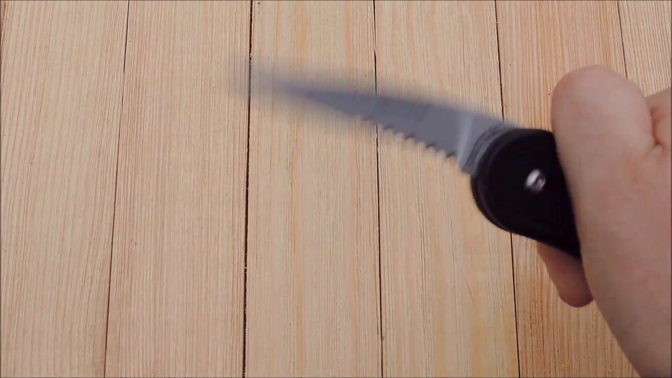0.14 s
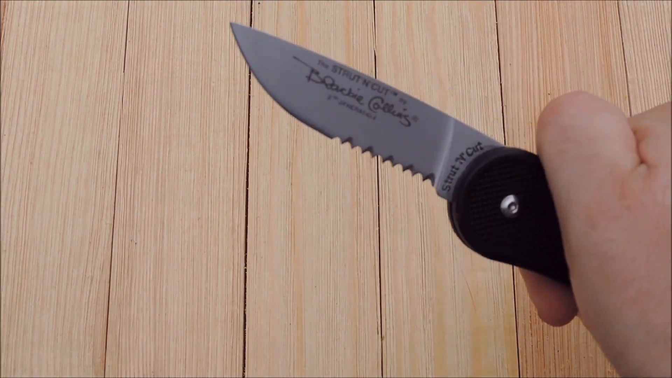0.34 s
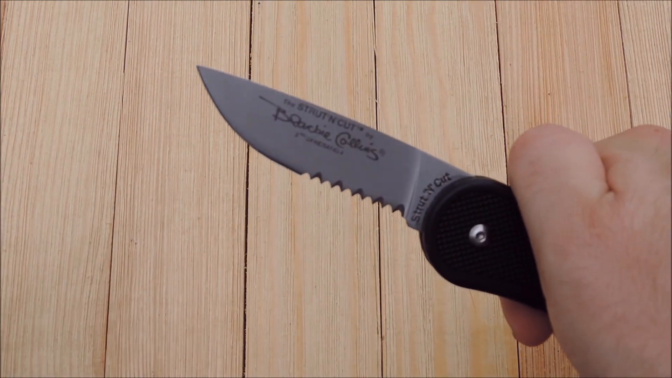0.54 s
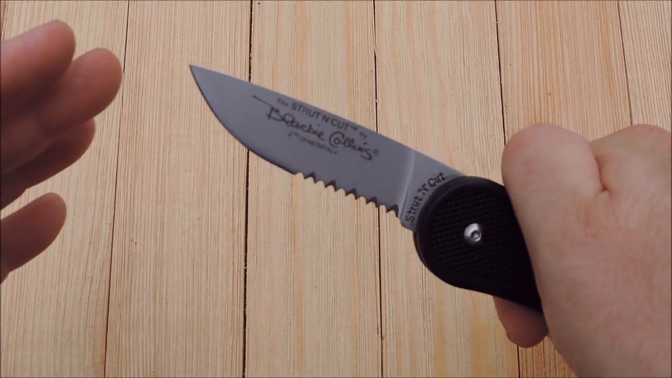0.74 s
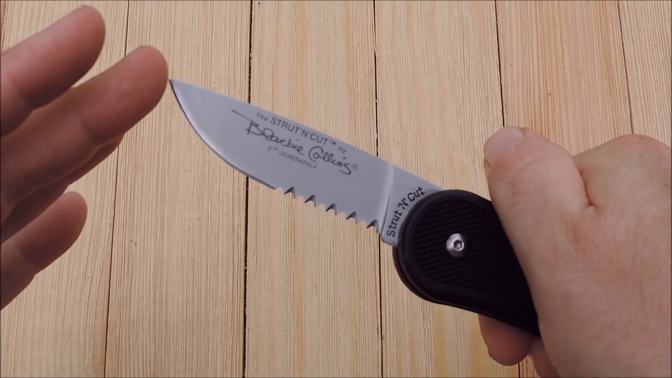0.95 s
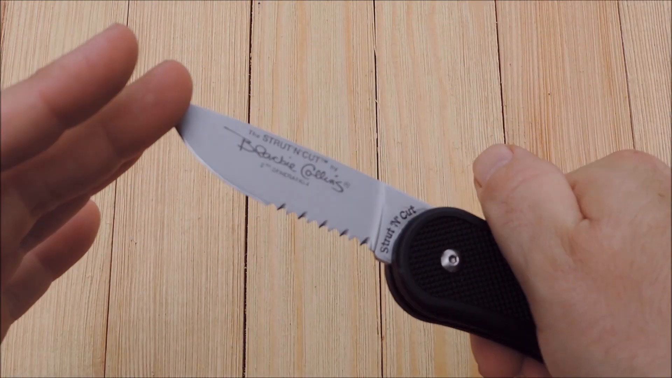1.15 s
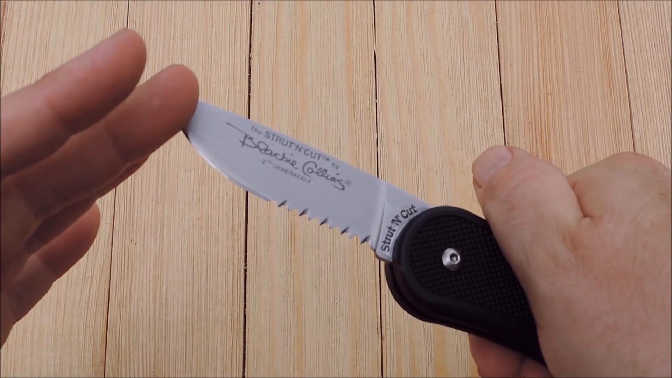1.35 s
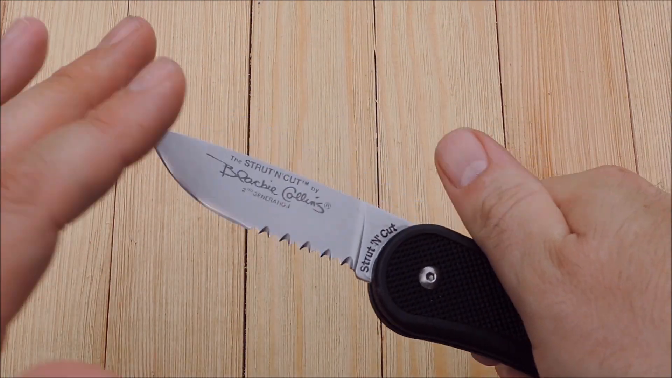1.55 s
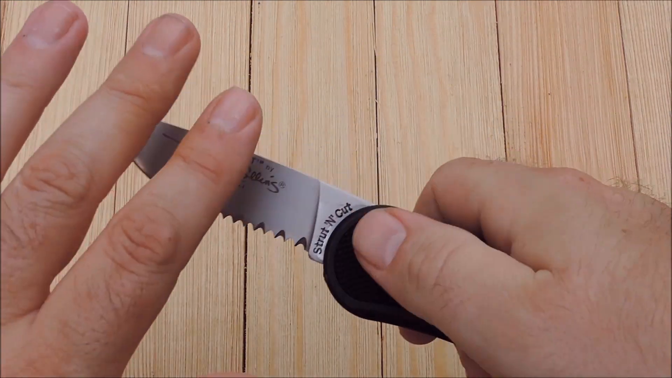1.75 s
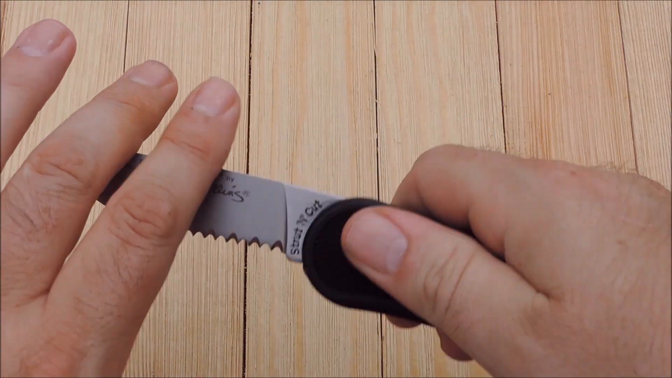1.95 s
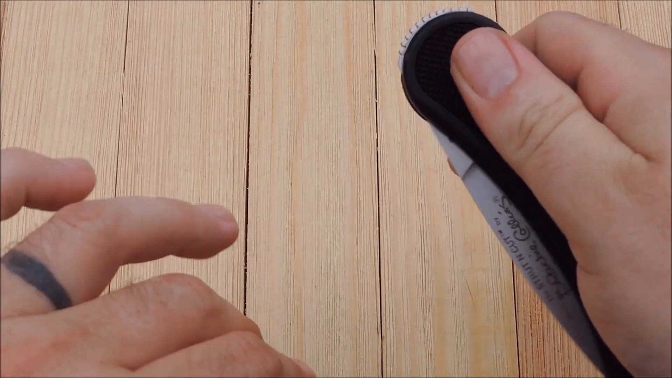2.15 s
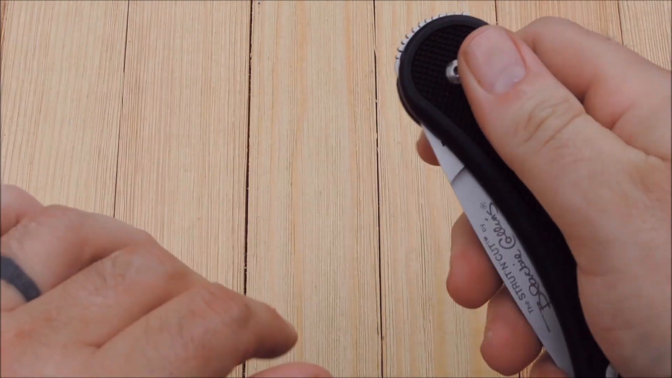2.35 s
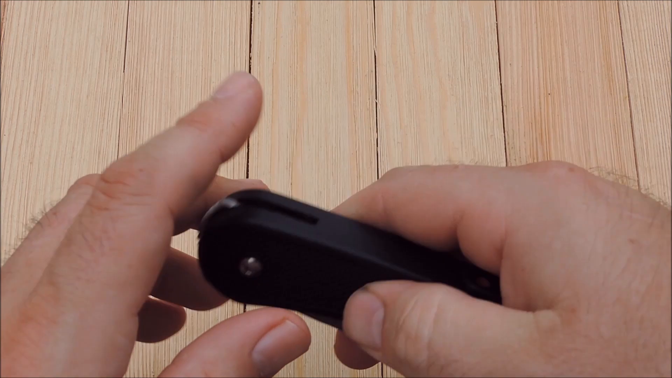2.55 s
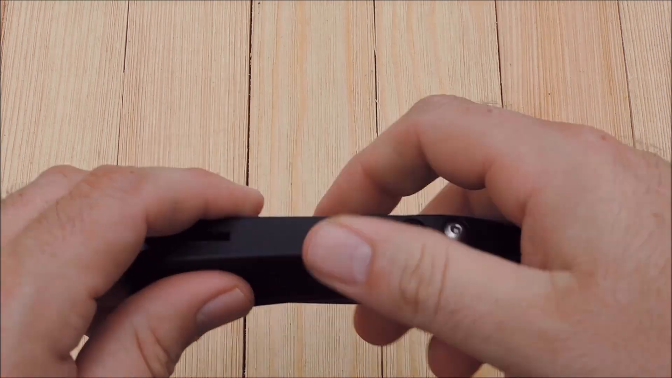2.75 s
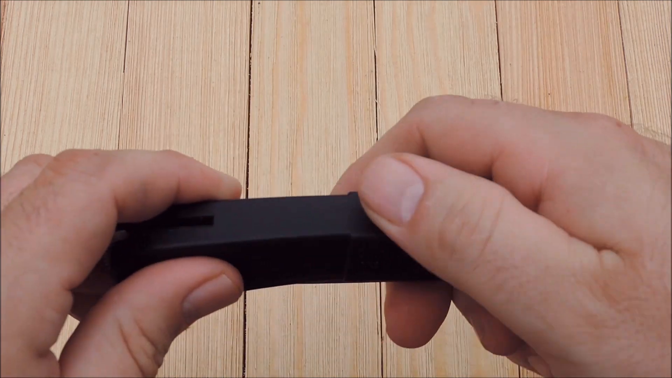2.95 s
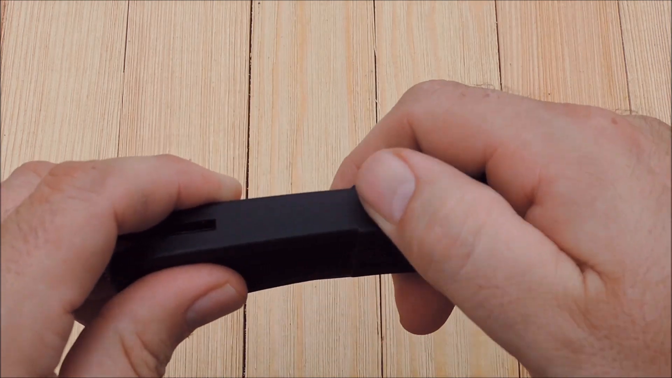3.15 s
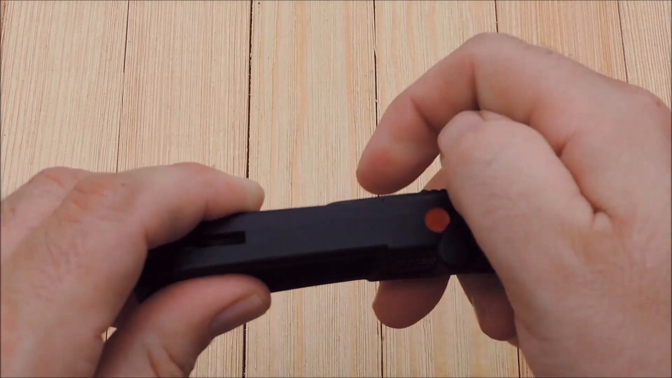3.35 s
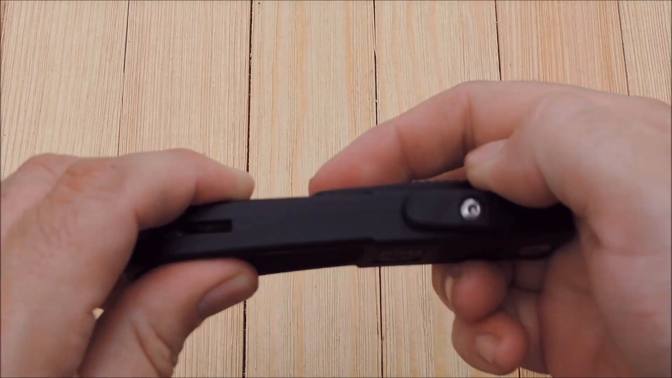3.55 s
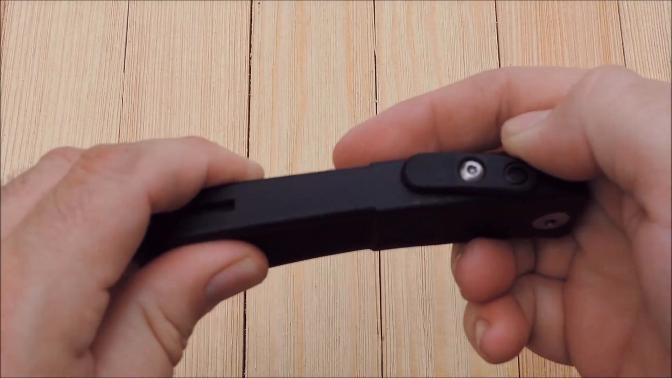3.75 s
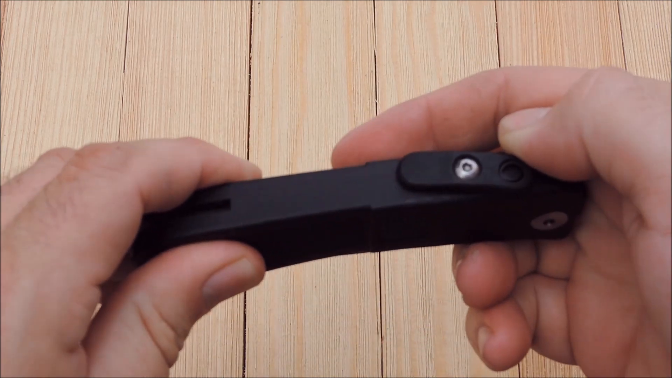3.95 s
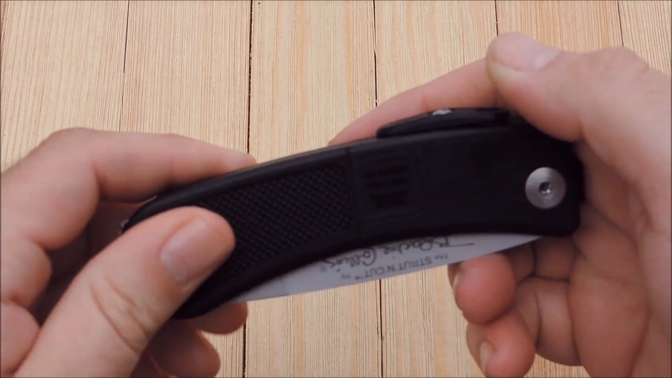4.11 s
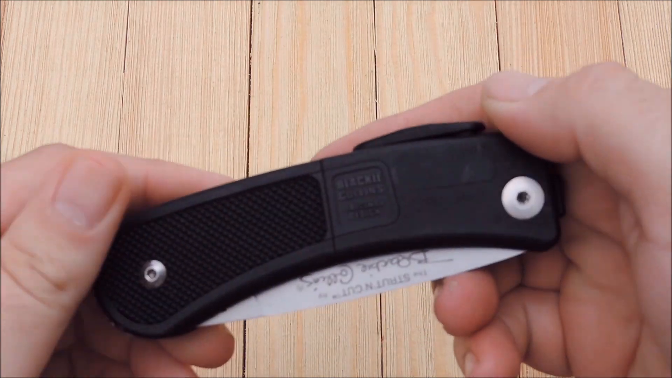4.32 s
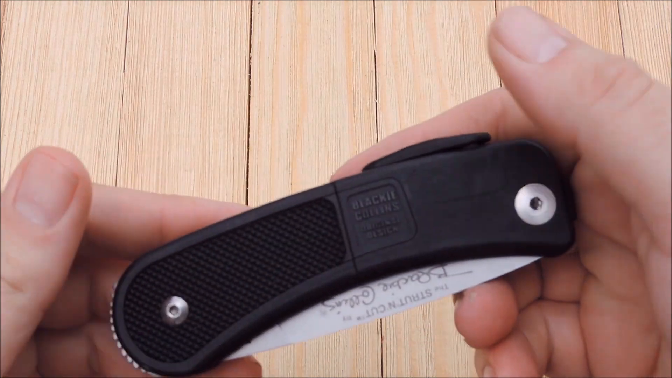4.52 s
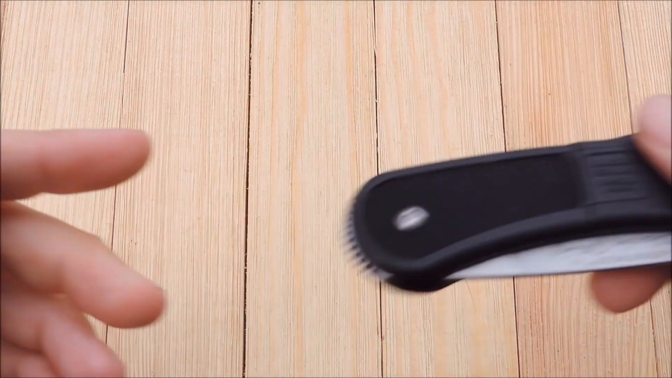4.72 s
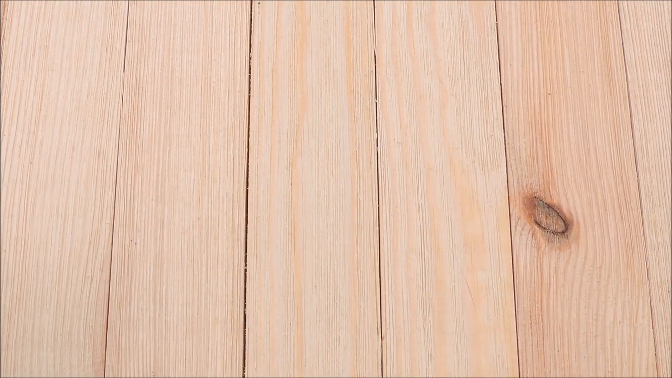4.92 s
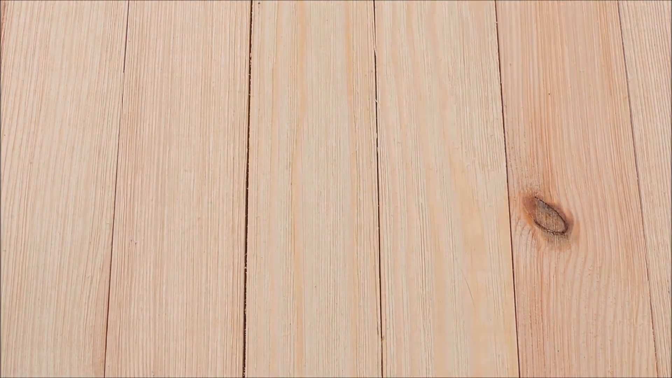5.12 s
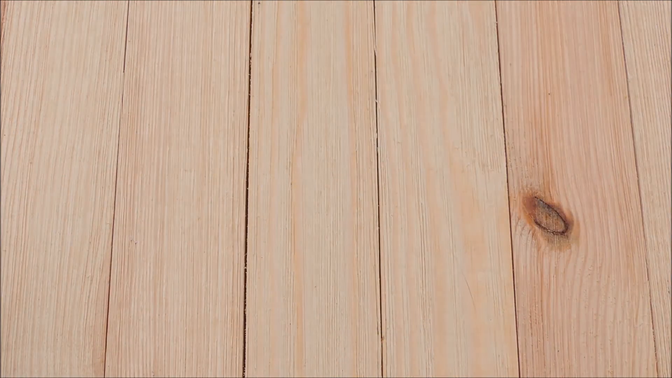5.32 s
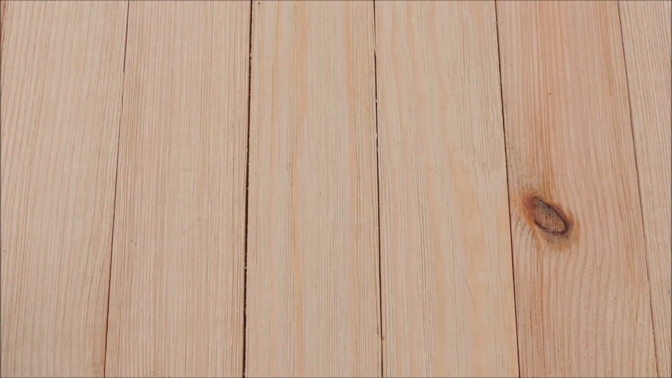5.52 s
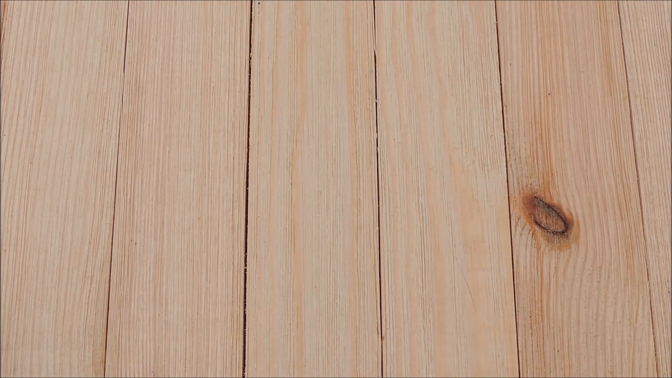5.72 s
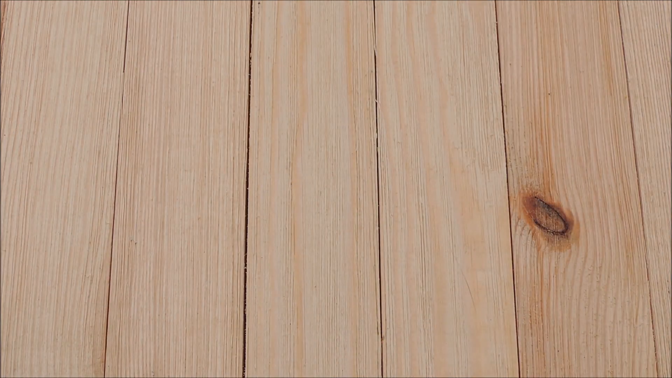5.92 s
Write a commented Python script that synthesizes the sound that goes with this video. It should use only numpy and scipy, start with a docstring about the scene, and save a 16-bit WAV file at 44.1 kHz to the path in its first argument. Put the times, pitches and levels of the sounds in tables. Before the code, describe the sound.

Indoors, two sharp metallic knife snaps, small catch clicks and a quiet double tap on a wooden table over faint hiss, with faint distant chirps.

```python
"""Folding knife over a wooden table

A blade snaps open, snaps shut and bounces; a catch ticks over and clicks home; the knife is laid down end by end.
Contacts, and one very faint high tick of unknown origin, are swelling tones, noise cracks through steel resonances
and a knock of the table; slides are rough noise through the handle cavity and the steel. A low drone, a rumble and
an airy hiss are shaped noise. A small far bird chirps faintly: gliding tones with roughened phase and echoes."""
import sys
import numpy as np
from scipy import signal
from scipy.fft import rfft, irfft, next_fast_len
from scipy.io import wavfile
from scipy.ndimage import uniform_filter1d

SR = 44100
rng = np.random.default_rng(int(sys.argv[2]) if len(sys.argv) > 2 else 0)


def generate_wav(sig):
    """Save sig (samples, or channels by samples) to the path in sys.argv[1] as 16-bit PCM at SR."""
    pcm = np.round(np.clip(np.atleast_2d(sig).T, -1, 1) * 32767).astype(np.int16)
    wavfile.write(sys.argv[1], SR, pcm)


def magnitude_from_level(level_db):
    """Linear magnitude for a level in decibels (20 dB per decade)."""
    exponent = np.asarray(level_db, float) / 20
    return 10 ** exponent


N = 267775  # length in samples

# low broad noise: (frequency [Hz], relative density [dB])
RUMBLE_SPECTRUM = [(8.8, -52), (15, -7), (84, -15.5), (117, -9), (182, -15), (221, -7.5), (321, -18),
                   (446, -18.5), (555, -17.5), (2800, -29.5), (3640, -68), (6160, -120)]
# airy noise: (frequency [Hz], relative density [dB])
HISS_SPECTRUM = [(1470, -27), (2500, -28), (3030, -7.5), (3510, -2), (4090, -3), (4500, 3.5), (7050, -7),
                 (8410, -17.5), (9260, -9), (10000, -8), (10600, -18.5), (13450, -21), (13650, -55),
                 (14500, -88)]
# wavering machine tones, whose response is squared in use: (frequency [Hz], width [Hz], level before squaring [dB])
DRONE_MODES = [(53.7, 9.1, -2.5), (120.8, 24, -2.5), (160.7, 13, -3.5), (224.8, 43.6, -1),
               (242.4, 34.4, -7), (288.6, 7.7, -5), (342.4, 22.5, -4), (364.7, 38, -5), (456.6, 28, -6),
               (693, 4.7, -11)]
# correlation of the two ports in the background: (frequency [Hz], left-right likeness [-1 to 1])
PORT_LIKENESS = [(60, 0.87), (130, 0.98), (290, 0.95), (640, 0.7), (1410, 0.49), (3100, -0.18),
                 (6820, 0.54), (15000, -0.24)]
# balance of the background: (frequency [Hz], left minus right [dB])
PORT_LEAN = [(60, 0), (180, 1.5), (550, 1), (1650, 2), (4970, -1), (15000, 0.5)]
# decay of the room: (frequency [Hz], time to fall 60 dB [s])
WALL_DECAY = [(300, 0.14), (2000, 0.24), (6000, 0.27), (14000, 0.21)]
# chirps of the bird: (time of the lowest pitch [s], level before direct and echo shares [dB], lowest pitch [Hz])
CHIRPS = [(1.345, -54.5, 3430), (2.755, -58, 3400), (4.015, -60, 3290), (4.47, -56, 3550),
          (5.345, -54, 3350), (5.425, -58.5, 3100)]
# where the knife is held: (time [s], left minus right [dB], left lag [s])
HELD_AT = [(0.35, 3, 4.5e-5), (2.3, -2, 2.5e-5), (3.75, -4, -0.5e-5), (5.9, 2.5, 4e-5)]
# resonances of the steel parts: (frequency [Hz], width [Hz], level [dB])
STEEL_MODES = [(3100, 380, -3.5), (3880, 630, -2.5), (4390, 540, 0.5), (5910, 390, -0.5), (7160, 93, -2.5),
               (7340, 170, -10.5), (8860, 810, -7.5), (11860, 1300, -9.5), (13300, 4000, -14),
               (14400, 1400, -11.5)]
# the table top answering through the air and the hands: (frequency [Hz], width [Hz], level [dB])
TABLE_MODES = [(30, 39, -10), (182, 200, -15), (598, 127, -2.5), (1035, 107, 1.5), (1450, 360, -8)]
# the handle's cavity as sliding parts excite it: (frequency [Hz], width [Hz], level [dB])
CAVITY_MODES = [(1960, 150, 8.5), (2550, 190, 2)]
# the blade sliding on its pivot and rattling loose:
# (start [s], length [s], share of it before the loudest point [0 to 1], rms [dB])
SLIDES = [(0.29, 0.043, 1, -50), (0.346, 0.06, 0.045, -50), (2.264, 0.025, 0.79, -85),
          (2.303, 0.083, 0.077, -53.5), (3.394, 0.01, 0.25, -49), (3.748, 0.015, 0.13, -46),
          (5.904, 0.028, 0.11, -48.5), (5.928, 0.053, 0.099, -49.5)]
# an end of the knife meets the table: (time [s], thud peak [dB])
LANDINGS = [(5.9047, -33), (5.9272, -30.5)]
# contacts inside the knife, and one very faint high tick of unknown origin at 3.669 s; levels before placing:
# (time [s], ring peak [dB], ring pitch [Hz], time scale [s], crack peak [dB])
CONTACTS_AND_TICK = [(0.253, -48, 1930, 0.0025, -59), (0.3114, -31.5, 1910, 0.0035, -35),
                     (0.3441, -9.5, 3120, 0.0017, -10.5), (0.3453, -6.5, 1970, 0.0051, -12.5),
                     (0.3515, -25.5, 1860, 0.0057, -23), (2.257, -42, 2210, 0.002, -40),
                     (2.2981, -16, 1734, 0.0042, -8), (2.2986, -5, 2580, 0.0019, -7.5),
                     (2.3011, -6, 2165, 0.0024, -10), (2.3043, -21.5, 2100, 0.0024, -24.5),
                     (2.3468, -36, 2060, 0.0045, -32.5), (2.3474, -30.5, 2630, 0.0043, -30),
                     (2.44, -40, 2730, 0.0016, -46), (3.292, -50, 2380, .002, -59),
                     (3.3952, -42.5, 1920, 0.003, -35), (3.398, -36.5, 3780, 0.002, -54),
                     (3.401, -42, 2645, 0.004, -52.5), (3.5116, -33.5, 2870, 0.00124, -45),
                     (3.5956, -40, 2064, 0.0014, -49), (3.669, -52, 13600, 0.005, -61),
                     (3.7512, -31, 3150, 0.0027, -25), (3.7517, -18.5, 7860, 0.0018, -16.5),
                     (3.7525, -28.5, 1890, 0.0027, -27)]

RUMBLE_DB, DRONE_DB, HISS_DB = -51.5, -52, -56  # rms
FALL_S, RISE_S = 0.075, 0.057  # the two halves of a chirp
FALL_HZ_PER_S, RISE_HZ_PER_S = 26000, 17000
RISE_DB = 0.5  # the upward flick over the fall
KNOCK_DB = -10.5  # the table's answer relative to the crack
FOLLOW_S, ROCK_S, ROCK_LOSS_DB = 0.002, 0.0061, 7  # handle after thud, mean time between rocks, loss a rock
HANDLE_HZ, HANDLE_S = 1907, 0.0035  # mean ring pitch and contact time scale
HANDLE_DB, HANDLE_CRACK_DB = -1, 0.5  # ring and crack relative to the thud
SPAN = SR // 4  # samples computed for one short event


def unit(x):
    """Normalisation of mean power: scaled to rms 1."""
    return x / np.sqrt(np.mean(x ** 2) + 1e-20)


def along(points, hz):
    """Interpolation of (frequency [Hz], value) points on a logarithmic frequency axis."""
    f, v = np.transpose(points)
    return np.interp(np.log(hz + 1), np.log(f + 1), v)


def filtered(x, response):
    """Linear filtering: the spectrum of x times a complex response of frequency."""
    n = x.shape[-1]
    m = next_fast_len(n + 8192)
    return irfft(rfft(x, m) * response(np.fft.rfftfreq(m, 1 / SR)), m)[..., :n]


def resonances(modes):
    """Modal superposition: causal second-order resonances summed with alternating sign."""
    def response(f):
        total = 0
        for k, (centre, width, db) in enumerate(modes):
            damping = 1j * f * width
            total = total + (-1) ** k * magnitude_from_level(db) * damping / (centre ** 2 - f ** 2 + damping)
        return total
    return response


def add_at(out, s, sound):
    """Superposition of a short event, from the sample holding time s."""
    start = int(s * SR)
    out[:, start:start + SPAN] += sound


def rush(colour, lag_s, patchy_db):
    """Partially correlated stereo noise of rms 1 in faint patches; the right port hears it lag_s earlier."""
    z = signal.stft(rng.standard_normal((2, N)), nperseg=512)[2]
    field = uniform_filter1d(rng.standard_normal(z.shape[1:]), 8, 0)
    field = uniform_filter1d(field, 24, 1)
    pair = signal.istft(z * magnitude_from_level(patchy_db * unit(field)), nperseg=512)[1][:, :N]

    def mid_side(hz):
        turn = np.arccos(np.clip(along(PORT_LIKENESS, hz), -1, 1)) / 2  # sets the correlation of the ports
        return colour(hz) * np.array([np.cos(turn), np.sin(turn)])

    def ports(hz):
        lean = magnitude_from_level(np.outer([.5, -.5], along(PORT_LEAN, hz)))
        return lean * np.exp(np.outer([-1j, 1j], np.pi * hz * lag_s))

    mid, side = filtered(pair, mid_side)
    return unit(filtered(np.array([mid + side, mid - side]), ports))


def rumble():
    """Broadband low-frequency noise, shaped by its spectral density."""
    return magnitude_from_level(RUMBLE_DB) * rush(lambda hz: magnitude_from_level(along(RUMBLE_SPECTRUM, hz)), 3e-5, patchy_db=1.5)


def drone():
    """Narrowband noise: each machine resonance passes a slowly wavering tone."""
    return magnitude_from_level(DRONE_DB) * rush(lambda hz: abs(resonances(DRONE_MODES)(hz)) ** 2, 3e-5, patchy_db=1.5)


def hiss():
    """Steady airy noise, shaped by its spectral density."""
    return magnitude_from_level(HISS_DB) * rush(lambda hz: magnitude_from_level(along(HISS_SPECTRUM, hz)), 0.00012, patchy_db=1.04)


def walls():
    """Frequency-dependent reverberation: a fresh stereo noise tail, scaled to energy 1 at the left port."""
    hz, t, z = signal.stft(rng.standard_normal((2, SPAN)), SR, nperseg=128)
    decay = magnitude_from_level(-60 * t / along(WALL_DECAY, hz)[:, None])
    tail = signal.istft(z * decay, SR, nperseg=128)[1][:, :SPAN]
    return tail / np.linalg.norm(tail[0])


def bird():
    """Frequency modulation: each chirp slurs down, hoarse, then flicks up again, blurred by echoes."""
    out, t = np.zeros((2, N + SPAN)), np.arange(SPAN) / SR - FALL_S
    for s, db, low_hz in CHIRPS:
        pitch = low_hz + np.where(t < 0, -FALL_HZ_PER_S, RISE_HZ_PER_S) * t
        swell = np.interp(t, [-FALL_S, .01 - FALL_S, -.01, 0, RISE_S - .015, RISE_S],
                          [0, 1, 1, .5, magnitude_from_level(RISE_DB), 0])
        hoarse = np.cumsum(rng.standard_normal(SPAN) * np.where(t < 0, .2, .06))  # phase wander [rad]
        call = magnitude_from_level(db) * swell * np.sin(2 * np.pi * np.cumsum(pitch) / SR + hoarse)
        echoes = signal.fftconvolve(call[None], walls(), axes=1)[:, :SPAN]
        add_at(out, s - FALL_S, 0.53 * call + 0.89 * echoes)
    return filtered(out[:, :N], lambda hz: 1 / (1 + (hz / 6500) ** 10))  # distance takes the treble


def placed(direct, s, wet_db):
    """Level and time differences between the ports set the direct sound in place; the room's answer is added."""
    when, lean_db, lag_s = np.transpose(HELD_AT)
    halves = np.array([[.5], [-.5]])
    late = np.pad(direct, ((0, 0), (130, 0)))  # the room answers 130 samples later
    late = signal.fftconvolve(late, walls(), axes=1)[:, :SPAN]
    near = magnitude_from_level(np.interp(s, when, lean_db) * halves) * direct
    within_sample = s * SR % 1 / SR
    nearer = rng.uniform(0, 2.5e-5, (2, 1))  # each part lies a little nearer one port
    delay = within_sample + 1e-4 + np.interp(s, when, lag_s) * halves + nearer
    return filtered(near + magnitude_from_level(wet_db) * late, lambda hz: np.exp(-2j * np.pi * hz * delay))


def clatter(envelope, modes, tilt):
    """Modal filtering of enveloped noise, tilted by hardness; each port faces other small parts."""
    noise = rng.standard_normal((3, len(envelope)))
    own_treble = filtered(noise[1:], lambda hz: np.clip(hz / 9000, 0, 1.5) ** 1.25)
    colour = lambda hz: resonances(modes)(hz) * (1 + 1j * hz / 4000) ** tilt
    return filtered((noise[0] + own_treble) * envelope, colour)


def table_knock():
    """Impulse excitation of the table's modes by a very short push, peak 1, alike at both ports."""
    t = np.arange(SPAN) / SR
    knock = filtered(np.exp(-t / 0.000089), resonances(TABLE_MODES))
    return np.tile(knock / abs(knock).max(), (2, 1))


def slide(length, share, db):
    """Stick-slip friction: grains of noise under one stroke excite the handle cavity and the steel."""
    t = np.arange(SPAN) / SR
    stroke = np.interp(t, [0, np.clip(share, .02, .98) * length, length], [0, 1, 0]) ** 0.97
    grain_db = 3.5 * np.repeat(rng.standard_normal(SPAN // 64 + 1), 64)[:SPAN]
    rub = clatter(stroke * magnitude_from_level(grain_db), CAVITY_MODES + STEEL_MODES, tilt=-0.53)
    rms = np.sqrt(np.sum(rub ** 2) / (2 * SR * length))
    return magnitude_from_level(db) * rub / rms


def landings():
    """Repeated impact with energy loss: the handle follows each thud and rocks to rest, weaker and duller."""
    rows = []
    for s, db in LANDINGS:
        for k in range(3):
            late = ROCK_S * k * rng.uniform(.85, 1.15)
            pitch = HANDLE_HZ * rng.normal(1, .02)
            level = db - ROCK_LOSS_DB * k
            rows.append((s + FOLLOW_S + late, level + HANDLE_DB, pitch, HANDLE_S, level + HANDLE_CRACK_DB))
    return rows


def ring_and_crack(ring_db, ring_hz, length, crack_db, knock):
    """Damped vibration: a ring swells and is choked, noise cracks through the steel modes, the table knocks."""
    t = np.arange(SPAN) / SR
    u = t / length
    after_ring = magnitude_from_level(-53.5 - 60 * t / 0.1) * (1 - np.exp(-u))  # thin, falls 60 dB in 0.1 s
    swell = u * np.exp(-3.2 * u ** 2) + after_ring
    wander = np.cumsum(rng.standard_normal(SPAN)) * 0.056  # roughens the ring's phase [rad]
    ring = swell / swell.max() * np.sin(2 * np.pi * ring_hz * t + wander)
    # a crack strong in itself or over its ring is brighter
    hardness = 0.063 * (crack_db - ring_db) + 0.01 * (crack_db + 10)
    crack = clatter(np.exp(-1.6 * u) + 1.1 * np.exp(-t / .0004), STEEL_MODES, hardness)
    return magnitude_from_level(ring_db) * ring + magnitude_from_level(crack_db) * (crack / abs(crack).max() + magnitude_from_level(KNOCK_DB) * knock)


def knife():
    """Superposition of friction, thuds on the table, contacts and the faint high tick, each set in the room."""
    out = np.zeros((2, N + SPAN))
    knock = table_knock()
    for s, length, share, db in SLIDES:
        add_at(out, s, placed(slide(length, share, db), s, wet_db=-33.0))
    for s, db in LANDINGS:
        add_at(out, s, placed(-magnitude_from_level(db) * knock, s, wet_db=-2))
    for s, ring_db, ring_hz, length, crack_db in CONTACTS_AND_TICK + landings():
        direct = ring_and_crack(ring_db, ring_hz, length, crack_db, knock)
        add_at(out, s, placed(direct, s, wet_db=-25.0))
    return out[:, :N]


def scene():
    """Linear superposition of background, bird and knife with the faint tick."""
    return rumble() + drone() + hiss() + bird() + knife()


def top_cut(x):
    """Nothing passes above the cut-off."""
    return signal.sosfilt(signal.butter(12, 16830, fs=SR, output="sos"), x)


def record(dry):
    """Saturation: the input stage rounds off the loudest peaks towards 0.62 of full scale."""
    rounded = dry / (1 + abs(dry / .62) ** 4) ** (1 / 4)
    return top_cut(rounded)


dry = scene()
out = record(dry)
generate_wav(out)
```